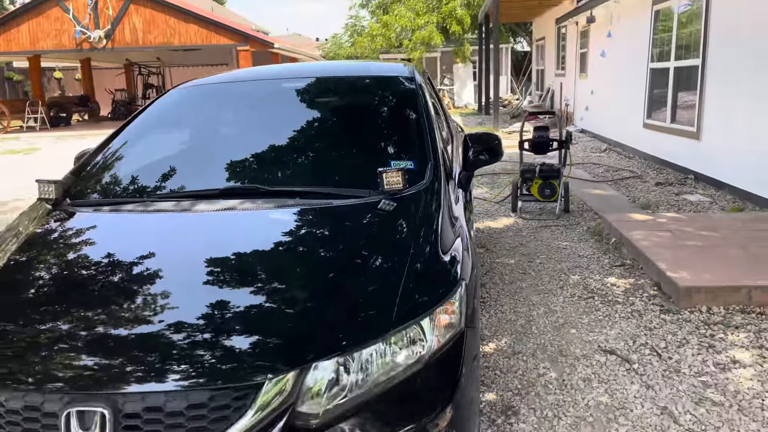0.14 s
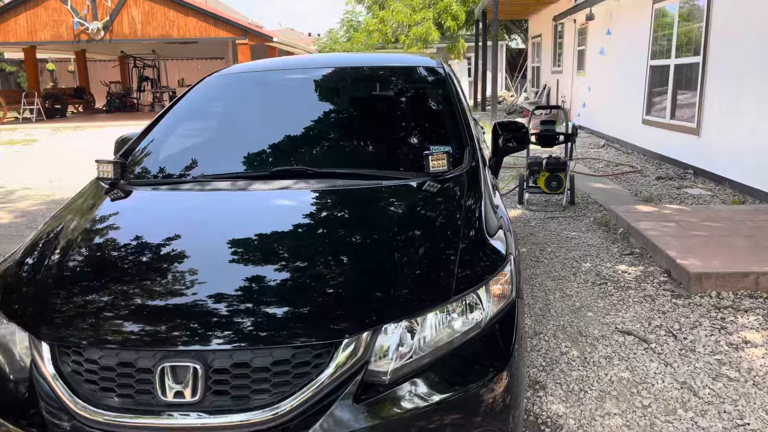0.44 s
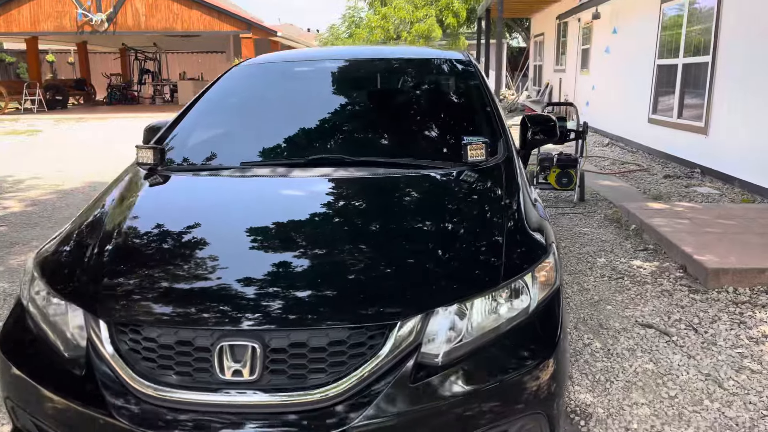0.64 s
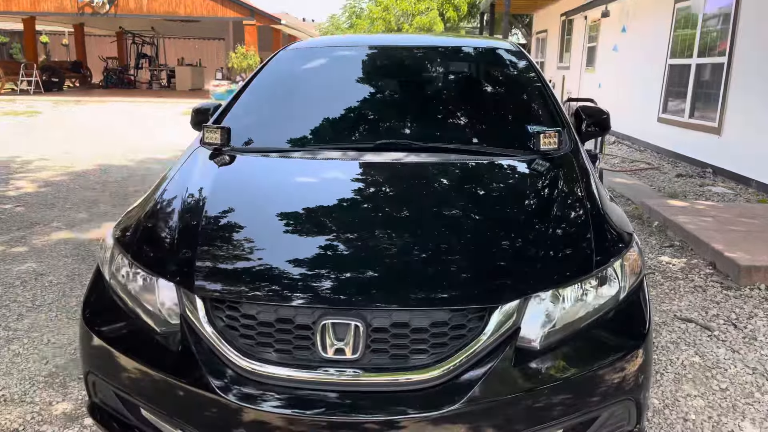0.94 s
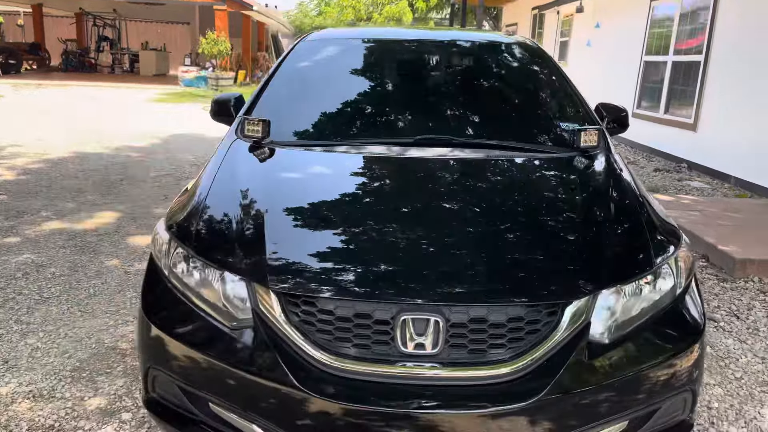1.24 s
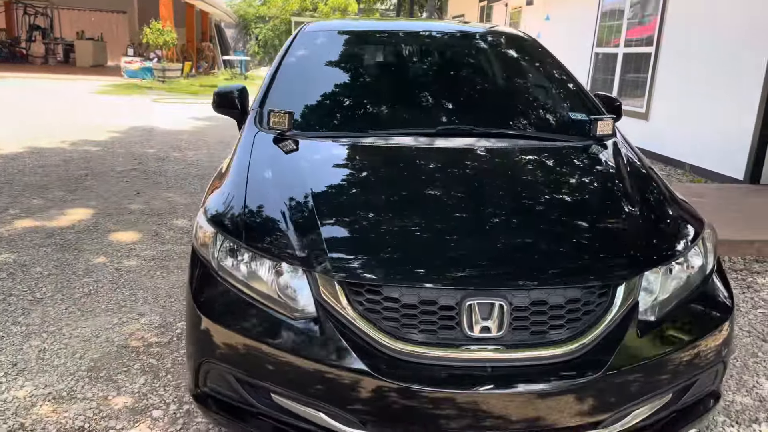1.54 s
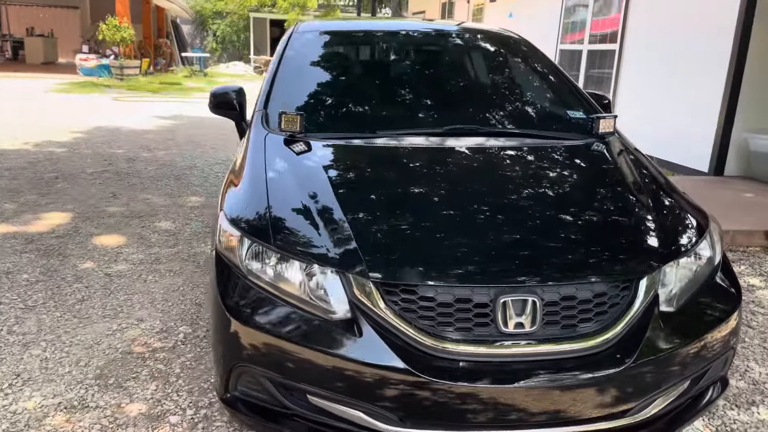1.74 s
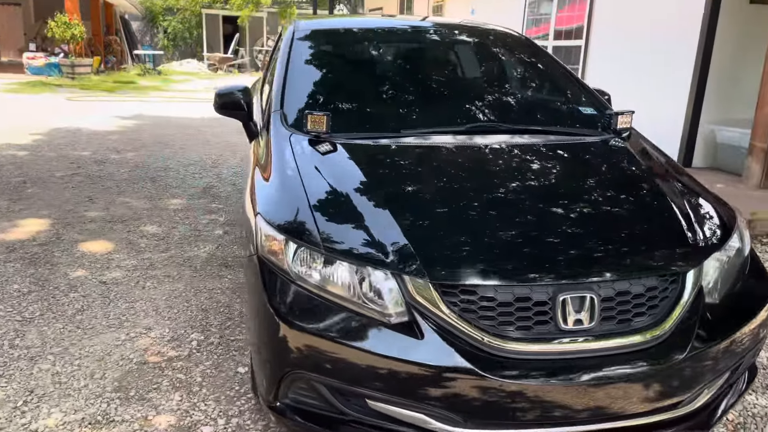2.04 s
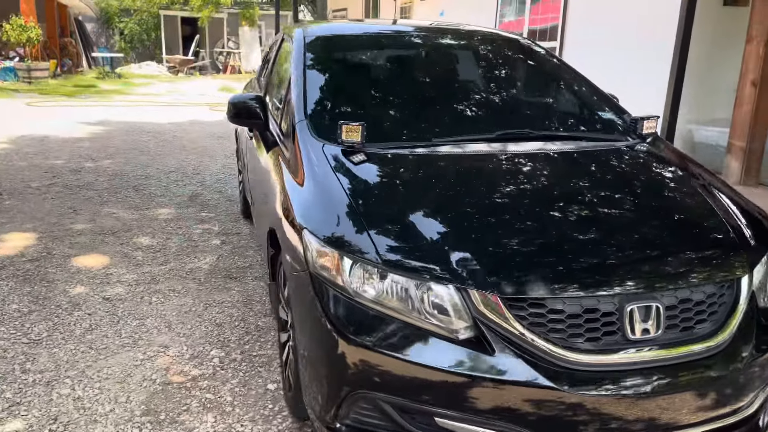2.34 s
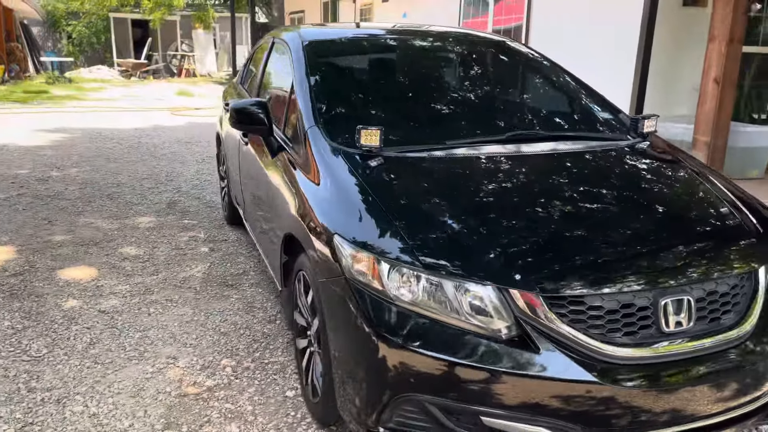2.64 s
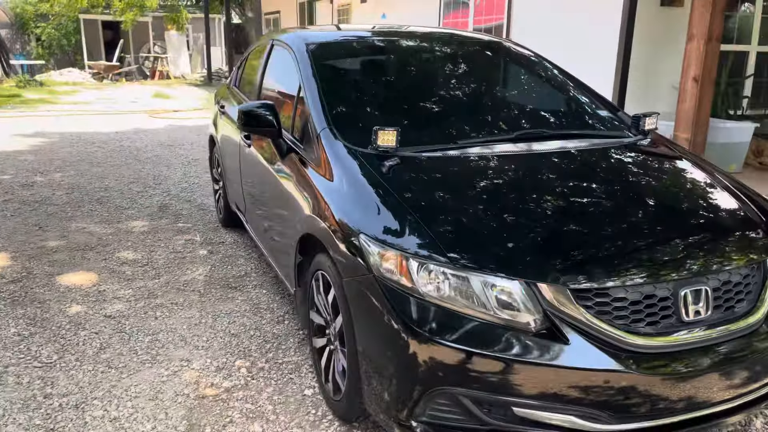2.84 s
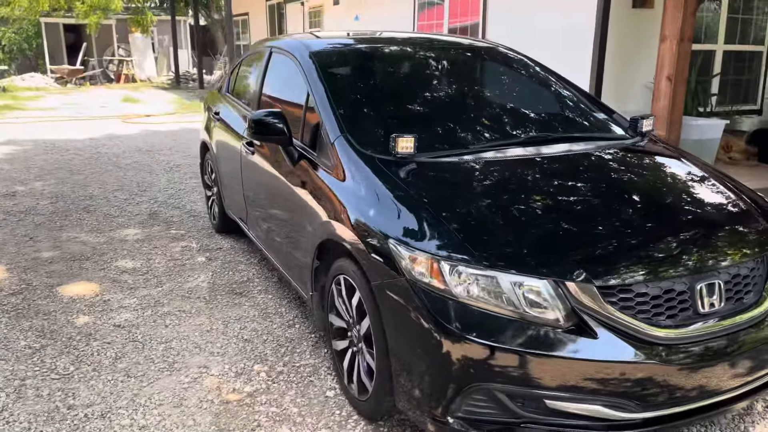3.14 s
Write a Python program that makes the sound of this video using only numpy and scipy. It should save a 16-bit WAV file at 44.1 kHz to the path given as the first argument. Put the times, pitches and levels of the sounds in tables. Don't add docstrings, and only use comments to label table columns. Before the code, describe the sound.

Slow gravel footsteps, soft and uneven, crunch at about 0.2, 0.5, 0.9 and 1.5 seconds, with small stones knocking, then grow sparse and faint. A lumpy low rumble and dull jolts shake the handheld phone throughout, strongest near 0.5 and 0.9. Light finger ticks cluster in the first second; faint cloth brushes follow. A sharp, loud snap hits at 2.8. A distant machine drones in open air, its whirr fading after 0.7.

```python
import sys
import numpy as np
from scipy import signal
from scipy.fft import rfft, irfft, next_fast_len
from scipy.io import wavfile
from scipy.ndimage import uniform_filter1d

SR = 44100
rng = np.random.default_rng(int(sys.argv[2]) if len(sys.argv) > 2 else 0)


def invert_db(level):
    return 10 ** (np.asarray(level, dtype=float) / 20)


def output_pcm(signal):
    pcm = np.clip(np.atleast_2d(signal).T, -1, 1) * 32767
    wavfile.write(sys.argv[1], SR, np.round(pcm).astype(np.int16))


N = 145530
TIME_S = np.arange(N) / SR
SIDES = np.array([[1], [-1]])
SNAP_S = 2.7762


def rms_one(x):
    return x / np.sqrt(np.mean(x ** 2) + 1e-20)


def at_hz(points, hz):
    point_hz, value = np.transpose(points)
    return np.interp(np.log(hz), np.log(point_hz), value)


def drift(rate_hz):
    r = np.exp(-80 * np.pi * rate_hz / SR)
    slow = signal.lfilter([1], [1, -2 * r, r * r], rng.standard_normal(N // 40 + 2002))[2000:]
    return np.interp(np.arange(N) / 40, np.arange(len(slow)), rms_one(slow))


def ring(clicks, hz, t60_s):
    r = invert_db(-60 / (t60_s * SR))
    w = 2 * np.pi * hz / SR
    return signal.lfilter([0, np.sin(w)], [1, -2 * r * np.cos(w), r * r], clicks + 1e-18)


def cut(x, hz, kind, order):
    return signal.sosfilt(signal.butter(order, hz, kind, fs=SR, output="sos"), x)


def strikes(start_s, size):
    out = np.zeros(N)
    np.add.at(out, np.clip((np.asarray(start_s) * SR).astype(int), 0, N - 1), size)
    return out


def later(x, lag_s):
    return np.interp(np.arange(N) - lag_s * SR, np.arange(N), x)


def band(hz, level_db):
    return invert_db(level_db) * rms_one(cut(rng.standard_normal((2, N)), list(hz), "band", order=5))


def banded(spectrum, alike, patchy_db, rate_hz):
    hz = np.arange(N // 2 + 1) * SR / N + 1e-3
    low_hz, high_hz = spectrum[0][0], spectrum[-1][0]
    likeness = np.clip(at_hz(alike, hz), 0, .99)
    mid, side = rfft(rng.standard_normal((2, N))) * invert_db(at_hz(spectrum, hz))
    pair = np.sqrt(1 + likeness) * mid + np.sqrt(1 - likeness) * side * SIDES
    out, together = 0, drift(rate_hz / 4)
    place = np.clip(2 * np.log2(hz / low_hz), 0, None)
    for k in range(int(2 * np.log2(high_hz / low_hz)) + 2):
        share = np.clip(1 - np.abs(place - k), 0, 1)
        flicker = invert_db(patchy_db * (together + drift(rate_hz)))
        out = out + irfft(pair * share, N) * flicker
    return rms_one(out)


# hz, density_db_per_hz
AIR_SPECTRUM = [(200, -49), (300, -12.5), (800, -4), (2200, -19), (2600, -22), (6500, -27), (7300, -60.5),
                (9500, -37.5), (9900, -89)]
# hz, likeness_0_to_1
AIR_ALIKE = [(250, .8), (600, .68), (1500, .6), (4000, .45), (9000, .5)]
# pitch_hz, width_hz, level_db
DRONE = [(384, 77, -54.5), (436, 13.6, -48.5), (802.5, 37, -48), (1092, 81, -51.5), (3715, 780, -55.5),
         (5020, 640, -57.5)]
AIR_DB, AIR_PATCHY_DB = -41, 1.1
WHIRR_HZ, WHIRR_DB, WHIRR_UNTIL_S, WHIRR_FADE_S = (1927, 2420), -52, 0.73, .1


def yard():
    out = AIR_DB_HISS = invert_db(AIR_DB) * banded(AIR_SPECTRUM, AIR_ALIKE, AIR_PATCHY_DB, rate_hz=20.6)
    for pitch_hz, width_hz, level_db in DRONE:
        t60_s = np.log(1000) / np.pi / width_hz
        mid, side = ring(rng.standard_normal((2, N)), pitch_hz, t60_s)
        out = out + invert_db(level_db + drift(4.5)) * rms_one(mid + 1.36 * side * SIDES)
    hidden = 1 + np.exp((TIME_S - WHIRR_UNTIL_S) / WHIRR_FADE_S)
    return out + band(WHIRR_HZ, WHIRR_DB) / hidden


# peak_s, rise_s, fall_s, level_db
STEPS = [(.17, 0.14, .08, -46), (.55, .02, .08, -52), (2.16, .05, 0.05, -52), (2.772, 0.02, 0.006, -36),
         (2.88, 0.044, .05, -52), (.885, .03, .02, -48), (.915, 0.01, 0.03, -46), (1.0, .03, .05, -50),
         (1.5, .02, .03, -46), (1.535, .02, .02, -43), (1.565, .02, .025, -40)]
STONES_PER_S, STONE_LOW_HZ, STONE_HIGH_HZ, STONE_CYCLES = 1100, 800, 5200, 6.7
STONE_SPREAD_DB, STONE_TILT_DB_PER_OCTAVE = 2.5, -4


def gravel():
    press = 0
    for peak_s, rise_s, fall_s, level_db in STEPS:
        away = np.where(TIME_S < peak_s, (peak_s - TIME_S) / rise_s, (TIME_S - peak_s) / fall_s)
        press = press + invert_db(level_db) * np.exp(-away)
    sizes = invert_db(STONE_SPREAD_DB * np.minimum(rng.exponential(1, N), 5)) * rng.choice([-1, 1], N)
    sizes *= rng.random(N) < STONES_PER_S / SR
    dealt = rng.integers(0, 16, N)
    pan = rng.uniform(.5, 1, (2, N))
    out = np.zeros((2, N))
    for k, hz in enumerate(np.geomspace(STONE_LOW_HZ, STONE_HIGH_HZ, 16)):
        tilt = invert_db(STONE_TILT_DB_PER_OCTAVE * np.log2(hz / 1000))
        out += tilt * ring(sizes * pan * (dealt == k), hz, STONE_CYCLES / hz)
    return rms_one(cut(out, 4100, "low", order=4)) * press


# start_s, peak_db, pitch_hz
KNOCKS = [(.132, -30, 1200), (.154, -34, 2300), (.1915, -21, 900), (.1915, -22, 1500), (.191, -27, 2200),
          (.536, -24, 1000), (.537, -28, 1700), (.538, -33, 4200), (.892, -27, 1100), (.883, -31, 1700),
          (.916, -26, 1300), (.917, -27, 1900), (.992, -29, 750), (1.524, -28, 1600), (1.539, -22, 1600),
          (1.498, -30, 1900), (1.51, -31, 2200), (1.552, -28, 1300), (1.555, -34, 3800), (1.56, -26, 1100),
          (1.575, -29, 2300), (1.563, -30, 2200), (1.568, -26, 2500), (1.569, -28, 4000),
          (1.5685, -33, 6000), (1.59, -32, 2800), (1.598, -29, 1600), (1.606, -33, 4500),
          (2.879, -28, 1200)]
KNOCK_CYCLES = 9


def knocks():
    out = 0
    for start_s, peak_db, hz in KNOCKS:
        stone = ring(strikes([start_s], invert_db(peak_db)), hz, KNOCK_CYCLES / hz)
        out = out + cut(stone, [hz / 2, hz * 1.6], "band", order=2)
    return out * invert_db([[-1], [1]])


# pitch_hz, level_db, t60_s
CASE = [(8800, 4, 0.0025), (11400, 2, .003), (5640, -8, 0.0024)]
# center_s, length_s, level_db
BRUSHES = [
    (1.0, .07, -64),
    (1.5, .012, -71),
    (1.58, 0.034, -65),
    (2.17, .03, -74),
    (2.76, .015, -57),
    (2.9, 0.054, -63),
    (2.96, .03, -73),
    (3.05, 0.022, -63),
]


def brushes():
    swell = 0
    for center_s, length_s, level_db in BRUSHES:
        swell = swell + invert_db(level_db) * np.exp(-((TIME_S - center_s) / length_s) ** 2)
    main_hz, _, main_t60_s = CASE[0]
    hiss = rms_one(ring(rng.standard_normal((2, N)), main_hz, main_t60_s))
    return cut(swell * hiss, [6500, 9300], "band", order=8)


# start_s, peak_db
TICKS = [(0.057, -40.5), (0.0626, -39.5), (0.136, -50.5), (0.187, -52), (0.2302, -47), (0.2343, -49.5),
         (0.2527, -59), (0.3518, -57), (0.5364, -53.5), (0.658, -45.5), (0.6613, -49.5), (0.6982, -37),
         (0.7163, -54), (0.7361, -52), (0.7902, -52), (0.7956, -55), (0.817, -34.5), (1.4914, -67),
         (1.501, -50), (1.5678, -50.5)]
# start_s, peak_db
DRAG = [
    (2.754, -57),
    (2.7565, -59),
    (2.7605, -55.5),
    (2.7645, -59),
    (2.768, -57),
    (2.7705, -54),
    (2.7722, -50),
    (2.7757, -27),
]
TICK_DB, TICK_DELAY_S, TICK_LAG_S, TICK_TOP_HZ = 7.5, 0.00088, .000245, 11900
DRAG_DULL_DB = -18


def ticks():
    start_s, peak_db = np.vstack([TICKS, DRAG]).T
    own_db = rng.normal(0, 1.2, (len(start_s), len(CASE)))
    own_db[len(TICKS):, 2] += DRAG_DULL_DB
    out = 0
    for k, (hz, level_db, t60_s) in enumerate(CASE):
        taps = strikes(start_s + TICK_DELAY_S, invert_db(peak_db + TICK_DB + level_db + own_db[:, k]))
        out = out + ring(taps, hz, t60_s)
    out = cut(cut(out, 5200, "high", order=3), TICK_TOP_HZ, "low", order=5)
    return np.array([out, np.roll(out, int(np.round(TICK_LAG_S * SR)))])


# pitch_hz, left_db, right_db, t60_s
SNAP_MODES = [(62.7, 4.5, -0.5, 0.082), (507, -6.5, -3, 0.0058), (742, -8, -2.5, 0.038),
              (1547, -7.5, 6.5, 0.0067), (2350, -5, -9.5, 0.0062), (3120, -10.5, -30, 0.0055),
              (4120, -15, -1, 0.0036), (4680, -13, 1, 0.0064), (4980, -14.5, -3, 0.0035)]
# low_hz, high_hz
SNAP_GAPS = [(2600, 2950), (3350, 3750)]
SNAP_DB, SNAP_LAG_S, SNAP_TOP_HZ = -7, 0.00046, 5500


def snap():
    blow = np.array([strikes([SNAP_S], 1), strikes([SNAP_S + SNAP_LAG_S], 0.62)])
    out = 0
    for hz, left_db, right_db, t60_s in SNAP_MODES:
        out = out + invert_db(SNAP_DB + np.array([[left_db], [right_db]])) * ring(blow, hz, t60_s)
    for gap_hz in SNAP_GAPS:
        out = cut(out, gap_hz, "bandstop", order=1)
    return cut(out, SNAP_TOP_HZ, "low", order=6)


# start_s, level_db
GUST = [(0.0, -27.5), (0.27, -25), (0.339, -26.5), (0.39, -16), (0.521, -30), (0.54, -19.5), (0.91, -26),
        (1.008, -18.5), (1.121, -30.5), (1.501, -20.5), (1.9, -29), (1.98, -22), (2.261, -29.5),
        (2.75, -23.5), (2.92, -30), (3.12, -27.5), (3.27, -33.5), (3.3, -40)]
# hz, density_db_per_hz
RUMBLE_SPECTRUM = [(12, -57.5), (20, -10), (39, -2.5), (59, 4.5), (113, -10), (296, -28), (353, -25.5),
                   (400, -32.5), (520, -36.5), (880, -120)]
RUMBLE_DB, RUMBLE_LUMPS_DB, RUMBLE_ALIKE, RUMBLE_EVEN_S = 2.5, 2.2, 0.96, 0.14


def rumble():
    alike = [(20, RUMBLE_ALIKE), (400, RUMBLE_ALIKE)]
    noise = banded(RUMBLE_SPECTRUM, alike, RUMBLE_LUMPS_DB, rate_hz=7.8)
    power = uniform_filter1d((noise ** 2).mean(0), int(RUMBLE_EVEN_S * SR))
    gust_db = np.interp(TIME_S, *np.transpose(GUST))
    return noise / np.sqrt(power + 0.079) * invert_db(gust_db + RUMBLE_DB)


# start_s, peak_db, bass_weight_db
JOLTS = [(0.153, -29, 11), (0.229, -41, 2), (0.245, -35, 5.5), (0.364, -15, 3.5), (0.481, -24, 5.5),
         (0.538, -1.5, -3), (0.59, -22, 1), (0.634, -27.5, 7), (0.687, -28.5, 12), (0.701, -26.5, 10.5),
         (0.799, -19.5, -21), (0.806, -19, 4.5), (0.912, -8.5, -5), (0.941, -24, 8), (0.958, -30, -7),
         (0.997, -16.5, 4), (1.014, -25, -5), (1.032, -18.5, -26), (1.166, -30.5, 3), (1.258, -30.5, 11),
         (1.272, -30, 12.5), (1.288, -30, 8.5), (1.343, -39, 2), (1.494, -17, -5), (1.499, -18.5, -8),
         (1.511, -17.5, 3.5), (1.533, -16.5, -9), (1.546, -13.5, -9), (1.668, -44, -2), (1.973, -20, -8.5),
         (1.988, -29, 5), (2.003, -24, 1), (2.074, -27, -5), (2.317, -14, -7), (2.326, -20.5, -3.5),
         (2.373, -29, -5), (2.386, -28, 5), (2.611, -18.5, 0), (2.622, -13, -19), (2.628, -25, 11),
         (2.645, -22.5, -2), (2.685, -30, 4.5), (2.779, -10, -13.5), (2.835, -25.5, 8), (3.068, -29.5, 4),
         (3.1, -28.5, 3), (3.17, -29.5, 5.5), (3.284, -23, 4)]
JOLT_DB, JOLT_LEAD_S, JOLT_SIDE_DB = 28, 0.0026, -1.5
JOLT_LOW_HZ, JOLT_KNEE_HZ, JOLT_TOP_HZ = 47, 168.5, 329
BOOM_HZ, BOOM_DB, BOOM_T60_S = (506, 513), -31.5, 0.023


def jolts():
    start_s, peak_db, bass_db = np.transpose(JOLTS)
    start_s, peak_db = start_s - JOLT_LEAD_S, peak_db + JOLT_DB
    own = rng.normal(0, 1, (len(start_s), 3))
    push = strikes(start_s, invert_db(peak_db))
    weight = cut(strikes(start_s, invert_db(peak_db + bass_db + 17.5)), JOLT_KNEE_HZ, "low", order=2)
    side = strikes(start_s + 0.0011, own[:, 0] * invert_db(peak_db + JOLT_SIDE_DB))
    side = cut(side, 60, "high", order=1)
    blunt = cut(push + weight + side * SIDES, JOLT_TOP_HZ, "low", order=3)
    boom = []
    for k, hz in enumerate(BOOM_HZ):
        boom.append(ring(strikes(start_s, invert_db(peak_db + BOOM_DB + own[:, k + 1])), hz, BOOM_T60_S))
    return cut(blunt + cut(boom, 456, "low", order=6), JOLT_LOW_HZ, "high", order=4)


# time_s, level_db
OPEN = [(0, .4), (.6, -.4), (1.25, 1.6), (2.0, .2), (2.6, -.6), (3.3, -2.2)]
# hz, left_minus_right_db
FAR_LEFT = [(60, 3.5), (180, -40.5), (510, -6), (1490, -7), (4370, 3.5), (12800, -7)]
AIR_LAG_S, AIR_TOP_HZ, BASS_LEFT_DB = 0.000452, 9650, 3.5
WHISTLE_HZ, WHISTLE_DB = (11800, 12150), -91


def scene():
    far = yard() * invert_db(np.interp(TIME_S, *np.transpose(OPEN))) + gravel()
    hz = np.arange(N // 2 + 1) * SR / N + 1e-3
    balance = invert_db(at_hz(FAR_LEFT, hz) * SIDES / 2)
    far = irfft(rfft(far) * balance * (hz < AIR_TOP_HZ), N)
    far[0] = later(far[0], AIR_LAG_S)
    whistle = band(WHISTLE_HZ, WHISTLE_DB + 2 * drift(3))
    near = knocks() + ticks() + snap() + brushes() + whistle
    shaking = (rumble() + jolts()) * invert_db(BASS_LEFT_DB * SIDES / 2)
    return far + near + shaking


def band_limit(x):
    return signal.sosfilt(signal.butter(12, 15900, fs=SR, output="sos"), x)


SMEAR_CYCLES, SMEAR_TURN = 1.15, 0.34
DUCK_DB, DUCK_S = -6, .007


def record(dry):
    size = next_fast_len(N + SR)
    hz = np.arange(size // 2 + 1) * SR / size + 10
    smear = np.exp(-2j * np.pi * (SMEAR_CYCLES * np.log(hz / 1000) + SMEAR_TURN))
    smeared = irfft(rfft(dry, size) * smear, size)[:, :N]
    since_s = TIME_S - SNAP_S - .0035
    dip = np.clip(since_s * 500, 0, 1) * np.exp(-np.abs(since_s) / DUCK_S)
    return band_limit(invert_db(DUCK_DB * dip) * smeared)


dry = scene()
out = record(dry)
output_pcm(out)
```